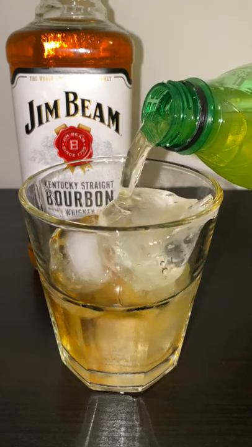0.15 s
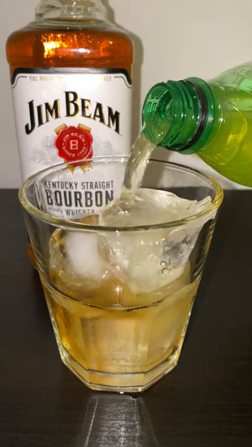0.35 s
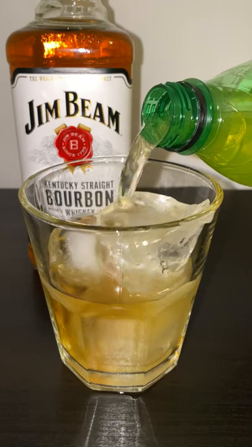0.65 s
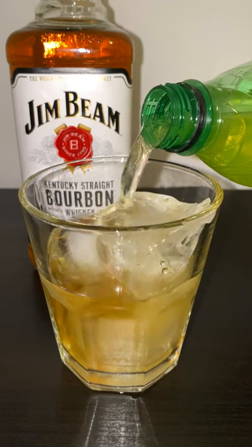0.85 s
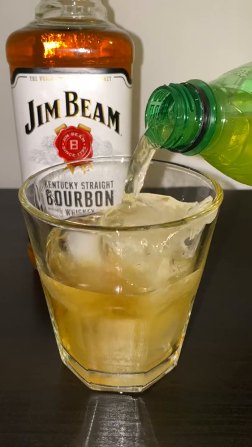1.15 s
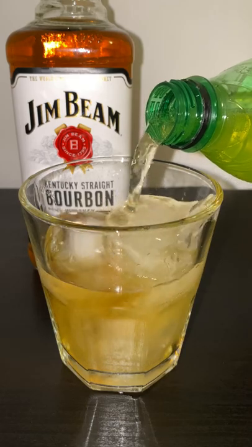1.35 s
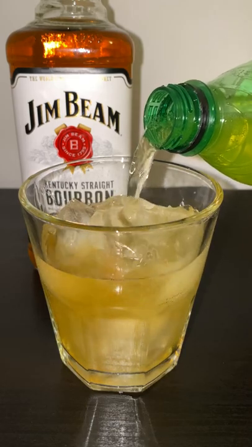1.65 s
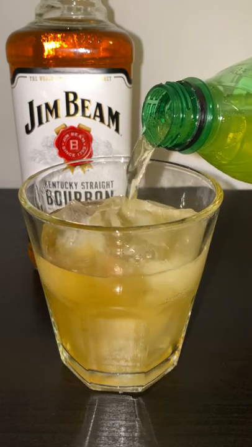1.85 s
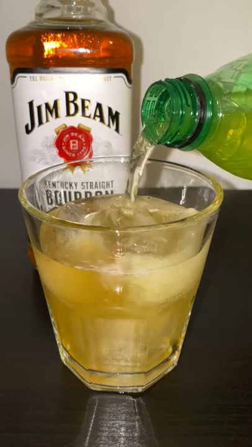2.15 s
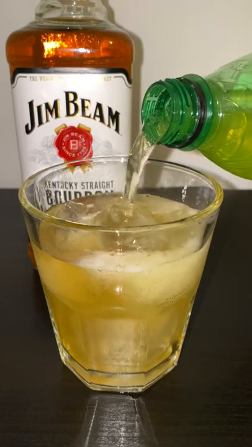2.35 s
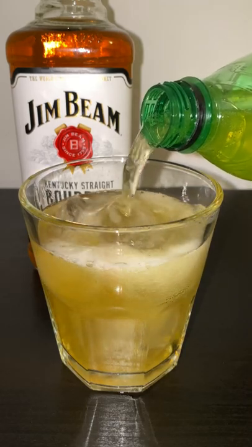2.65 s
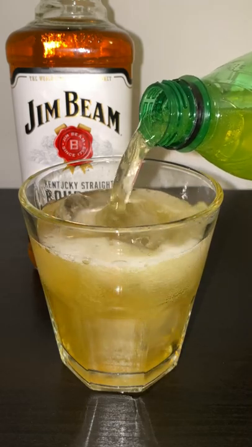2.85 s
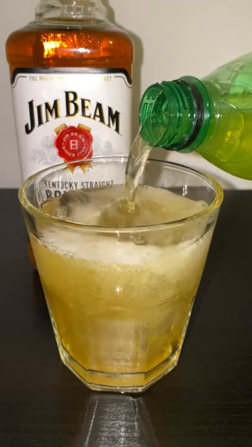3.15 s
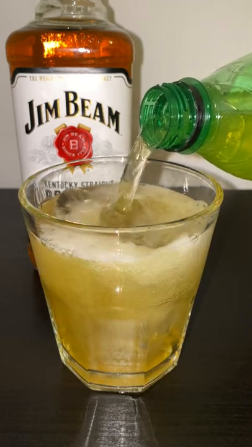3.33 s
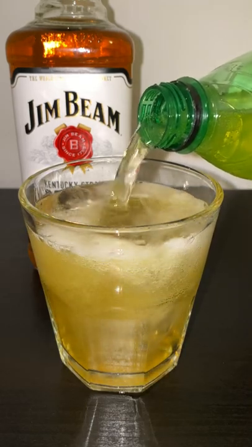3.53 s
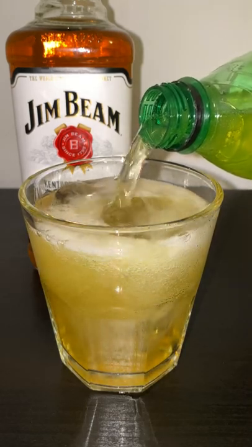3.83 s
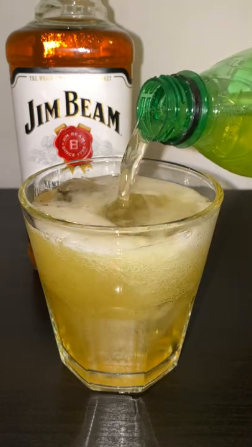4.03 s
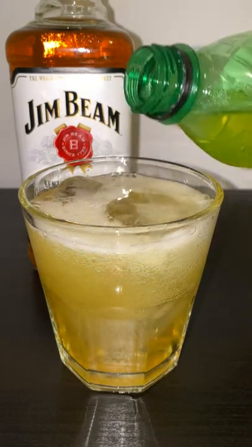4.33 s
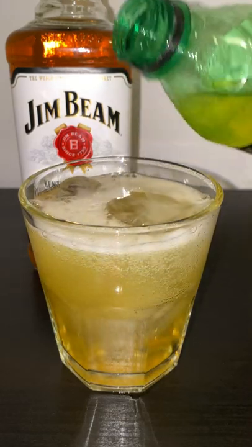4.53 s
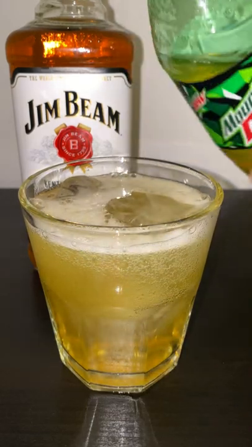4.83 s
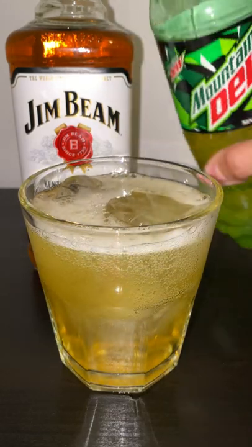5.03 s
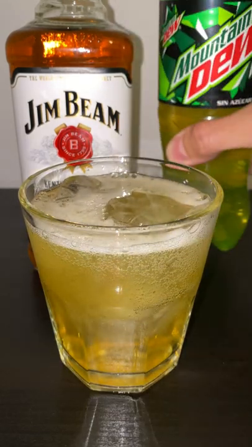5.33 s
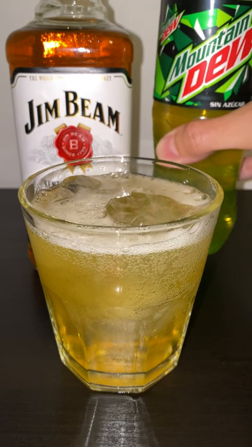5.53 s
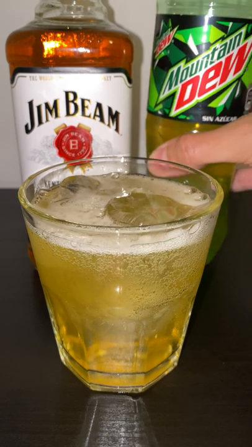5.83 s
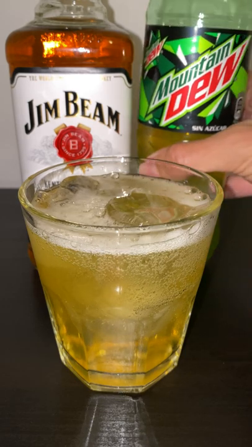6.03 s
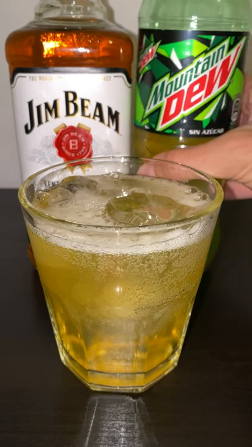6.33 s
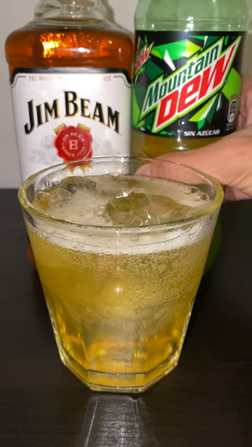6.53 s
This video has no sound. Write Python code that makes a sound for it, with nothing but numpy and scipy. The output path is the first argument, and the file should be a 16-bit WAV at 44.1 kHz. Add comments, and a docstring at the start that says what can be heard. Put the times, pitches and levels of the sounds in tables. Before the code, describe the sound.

Soda trickles from a plastic bottle onto ice in a glass, with small bubbly plinks and sharp ticks of cracking ice. The cubes shift and clatter against the glass, then float and knock softly as a fine fizz builds. The bottle gives a small pop as the pour ends and is set down on a table with a few dull thumps. Heard close up in a small room with a faint low rumble.

```python
"""Over the low rumble of a small room, soda pours from a plastic bottle onto ice in a glass tumbler.
Trapped bubbles plink; the ice cracks as it warms, then shifts and tumbles against the glass.
The cubes float and nudge the wall; from 2 s a head of foam builds, fizzing as its bubbles burst.
At 4.35 s the pour ends and the bottle, tipped back, pops as its wall springs out.
At 6 s it is set down on the table with a few dull thumps and short slides."""
import sys
import numpy as np
from scipy import signal
from scipy.fft import rfft, irfft, next_fast_len
from scipy.io import wavfile
from scipy.ndimage import uniform_filter1d

SR = 44100
rng = np.random.default_rng(int(sys.argv[2]) if len(sys.argv) > 2 else 0)


def generate_wav(signal):
    """Clip the signal to [-1, 1] and save it as 16-bit WAV at the path in sys.argv[1]."""
    frames = np.transpose(np.atleast_2d(signal))
    scaled = np.clip(frames, -1, 1) * 32767
    pcm = np.round(scaled).astype(np.int16)
    wavfile.write(sys.argv[1], SR, pcm)


N = 294588
TIME_S = np.arange(N) / SR
POUR_END_S, CHURN_HZ = 4.35, 879.5

# Table levels are relative; each source adds its own gain.
# room noise spectrum: f/Hz, level/dB
RUMBLE_SPECTRUM = [(18, -46), (30, -27.5), (45, 0), (55, -14), (72, 3.5), (100, -10), (170, -12),
                   (230, -18), (350, -30), (530, -28), (640, -30.5), (740, -50.5), (1400, -47),
                   (12000, -65.5)]
# largest bubbles trapped by the stream: t/s, level/dB, f/Hz
PLINKS = [(0.178, -62.5, 6660), (0.218, -53, 3060), (0.236, -54, 5470), (0.479, -51.5, 6600),
          (0.654, -41.5, 2020), (0.698, -60, 3130), (0.821, -52, 3800), (0.85, -54, 3800),
          (0.966, -59.5, 4760), (1.04, -55.5, 2610), (1.1, -48, 1663), (1.113, -65, 6230),
          (1.252, -49, 2720), (1.297, -63.5, 6500), (1.338, -49.5, 2770), (3.279, -54.5, 3650),
          (3.348, -56, 2980), (3.543, -55.5, 3020)]
# stream splashing off bare ice: t/s, level/dB, bubble f/Hz
SPLASHES = [(.2, -80, 4520), (0.578, -62.5, 3940), (.68, -67, 3070), (.84, -65.5, 3800), (0.949, -73, 4830),
            (1.04, -80, 3520), (1.119, -81, 5830), (1.328, -76, 2770)]
# trickle between cubes, fading once they are covered: start/s, ramp end/s, fade/s, level/dB, fall/(dB/s)
TRICKLE_ENVELOPE = (0.2, 2.7, 1.23, -72.5, 51)
# head of foam: start/s, full/s, collapse/s, level/dB, fall/(dB/s)
FINE_HEAD = (2, 4, 5, -67.5, 6)
COARSE_HEAD = (2.5, 3.5, 5, -76.5, 6.5)
# spectra of bursting foam: f/Hz, level/dB
FINE_SPECTRUM = [(1500, -38), (2450, -4), (2750, -14), (3050, -3), (3400, -4), (3750, -0.5), (4150, -4.5),
                 (4550, -3), (5300, -2), (6900, -2.5), (7900, -7.5), (8500, -13.5), (10500, -31.5),
                 (12000, -71)]
COARSE_SPECTRUM = [(600, -25), (900, -1.5), (1300, -17), (1600, 1), (2100, 6), (2450, 7), (3000, 14.5),
                   (4000, -113.5)]
# air resonances above the foam: f/Hz, width/Hz, level/dB
HEADSPACE = [(2520, 120, -5.5), (3020, 200, -5), (3690, 240, -4.5), (4475, 200, -1.5)]
# ice cracking: t/s, level/dB
CRACKS = [(0.1313, -62.5), (0.2054, -66), (0.2376, -57), (0.2996, -52), (0.3319, -52), (0.356, -52.5),
          (0.478, -52), (0.7463, -60), (0.8497, -64), (0.898, -56.5), (0.967, -61), (1.279, -58),
          (1.3384, -62)]
# ice striking the glass: t/s, clack/dB, weight/dB, wall ring/dB
KNOCKS = [(0.493, -41.5, -34.5, -52), (0.5095, -42, -33.5, -48), (0.5349, -42.5, -40, -69),
          (0.5773, -35.5, -50, -48), (0.596, -38, -46.5, -43.5), (0.6064, -50, -49.5, -46.5),
          (0.6199, -39.5, -41, -48), (0.6835, -42.5, -45.5, -73), (0.93, -45, -39.5, -62),
          (0.9461, -49.5, -35.5, -52), (0.9524, -39.5, -48, -46), (1.2057, -51, -53.5, -52.5),
          (1.2129, -43.5, -41.5, -50.5), (1.3631, -34.5, -34.5, -66.5), (1.3834, -42, -61, -73),
          (1.406, -35, -34, -53.5), (1.4213, -31, -35.5, -50), (1.4396, -33.5, -36.5, -77),
          (1.4733, -32.5, -37, -66.5), (1.4858, -24, -37.5, -40.5), (1.517, -25.5, -35, -56),
          (1.5663, -34.5, -39.5, -50.5), (1.591, -26, -43, -55.5)]
# floating cubes touching the glass: t/s, level/dB
NUDGES = [(1.294, -53), (1.724, -59), (1.808, -57.5), (1.82, -62), (2.011, -62.5), (2.119, -63),
          (2.693, -47), (2.871, -59.5), (2.896, -58), (2.934, -57), (3.036, -51), (3.179, -55), (3.23, -59),
          (3.366, -61), (3.68, -59), (4.317, -62.5)]
# modes of ice, glass and table: f/Hz, level/dB, t60/s
CRACK_MODES = [(2330, -3, .005), (4100, -11, .004), (5300, -7, 0.0034), (6970, -5, 0.01),
               (8630, -6, 0.0034), (9030, -18, 0.0044)]
CUBE_MODES = [(1010, 4.5, 0.011), (1254, -3.5, 0.072), (1540, 6, 0.019), (1840, 18, 0.0052),
              (1880, 3.5, 0.014), (2460, 3.5, 0.011), (2628, 6.5, 0.015), (3440, 1.5, 0.006)]
GLASS_WALL_MODES = [(4237, -2.5, 0.06), (4480, -6.5, 0.038), (5700, -7, 0.0082), (7100, -3, 0.028),
                    (7230, 2, 0.023), (8800, -16, 0.0033), (10700, -25.5, 0.015)]
GLASS_BODY_MODES = [(459, -5, .07), (516, 1, 0.15), (600, -1, 0.096), (678, -5, 0.17), (822, -1.5, 0.08),
                    (911, 3.5, 0.051), (968, -1, 0.12)]
GLASS_BASE_MODES = [(212.6, 3, 0.13), (243, -6, 0.16), (317.4, 0.5, 0.11), (334.6, -4.5, 0.12)]
TABLE_MODES = [(88.9, 1.5, .17), (114, -4, .1), (148, -4, 0.083)]
SUNK_CUBE_MODES = [(503.5, 3, 0.069), (616, 3, 0.022), (679, 1, 0.024), (840, -6, 0.035),
                   (920, -10.5, 0.12), (1205, -13.5, 0.04), (1655, -14, 0.033), (2070, -11, .014)]
# bottle wall springing back: t/s, level/dB
POPS = [(4.347, -44)]
# bottle feet landing: t/s, tap/dB, body/dB
LANDINGS = [(6.015, -90, -46), (6.072, -47.5, -30.5), (6.086, -67, -33.5), (6.398, -51, -39.5),
            (6.408, -87, -39)]
# modes of the bottle: f/Hz, level/dB, t60/s
BOTTLE_WALL_MODES = [(387, -2.5, 0.16), (707, 0, 0.052), (752, 0, 0.052), (1480, -10, 0.095),
                     (1560, -12, 0.029), (2590, -5, 0.051)]
BOTTLE_FOOT_MODES = [(930, -15, 0.045), (1240, -0.5, 0.024), (1510, -2.5, 0.054), (1930, -12.5, 0.028),
                     (2780, -4, 0.0099)]
BOTTLE_BODY_MODES = [(150.4, 4, 0.27), (201, 0.5, .12), (268, -7.5, 0.12), (329.5, 3, .1),
                     (427, -1.5, 0.22), (540, -8.5, 0.13), (667, -15.5, 0.066), (833, -23.5, 0.14)]
# table top swinging under the bottle: t/s, level/dB, f/Hz, length/s
THUMPS = [(6.012, -27, 91.1, 0.063), (6.066, -23, 79.3, 0.099), (6.168, -44, 86.9, 0.14),
          (6.337, -40, 90.2, 0.11), (6.398, -26, 94, 0.061)]
# bottle base rubbing the table: t/s, length/s, level/dB
SLIDES = [(5.996, .14, -57.5), (6.32, 0.14, -61.5), (6.498, 0.12, -65.5)]
# rubbing spectrum: f/Hz, level/dB
RUB_SPECTRUM = [(100, 7), (200, 2), (450, 11), (650, 1), (800, -16.5), (1050, -20), (1270, -5),
                (1400, -16.5), (1530, -19.5), (1900, -16), (4000, -51)]
# room decay: f/Hz, t60/s
ROOM_T60 = [(80, 0.46), (300, 0.62), (900, 0.11), (2000, 0.15), (4500, 0.25), (8000, 0.23), (12000, 0.21)]
# part of the side that follows the mid: f/Hz, share (0-1), phase lead/rad
SIDE_COHERENCE = [(60, .1, -1.6), (250, 0.1, -3), (500, 1, -1.2), (950, .6, -2), (1510, .5, 1.4),
                  (2000, .5, 1.5), (2500, 0.2, 3.), (3050, .6, 5), (3900, 0.9, 4), (4400, 0.3, 5),
                  (4970, 1, 4.5), (5900, .2, 1.5), (6890, .82, 1.74), (8200, .8, 1.4), (9500, .55, 1.5)]
# side gain: f/Hz, level/dB
SIDE_GAIN = [(60, -39), (100, -7.5), (180, -11), (310, -5.5), (540, 2.5), (940, 5.5), (1700, 1),
             (2900, 2.5), (4900, 4), (5900, -8), (7200, -4.5), (8500, 0.5), (10000, 6.5)]


def amp(db):
    return 10 ** (np.asarray(db) / 20)


def unit_rms(x):
    """Scale to rms 1 in the mid (row 0)."""
    return x / np.sqrt(np.mean(x[0] ** 2) + 1e-20)


def log_interp(points, hz):
    """Table lookup on a log-frequency axis."""
    table_hz, value = np.transpose(points)
    return np.interp(np.log(hz + 1), np.log(table_hz + 1), value)


def coloured(x, spectrum):
    """Filter by a spectrum in dB."""
    size = next_fast_len(N + 4096)
    gain = amp(log_interp(spectrum, np.fft.rfftfreq(size, 1 / SR)))
    return irfft(rfft(x, size) * gain, size)[..., :N]


def add(mix, at_s, sound):
    part = mix[:, max(round(at_s * SR), 0):][:, :sound.shape[1]]
    part += sound[:, :part.shape[1]]


def swells(events, rise_s, fall_s):
    """Envelope: 60 dB rise to and fall from each event (t/s, level/dB), summed in power."""
    at_s, db = np.transpose(events)[:, :, None]
    t = TIME_S[::64]
    each = amp(db - 60 * np.maximum((at_s - t) / rise_s, (t - at_s) / fall_s))
    return np.interp(TIME_S, t, np.linalg.norm(each, axis=0))


def plateau(start_s, full_s, fade_s, db, fall_db_per_s):
    """Envelope: linear ramp to a hold, decaying from fade_s."""
    ramp = np.clip((TIME_S - start_s) / (full_s - start_s), 0, 1)
    return ramp * amp(db - fall_db_per_s * np.maximum(TIME_S - fade_s, 0))


def impulses(per_s, spread_db):
    """Clicks at random times, uneven in size."""
    hit = rng.random(N) < per_s / SR
    sign = rng.choice([-1., 1.], (2, N))
    return hit * sign * amp(spread_db * np.minimum(rng.exponential(1, N), 4))


def ring(modes, detune=0.):
    """One blow, mid and side: decaying modes, each starting within its first cycle."""
    hz, db, t60_s = np.transpose(modes)[:, :, None]
    t = np.arange(int(min(t60_s.max(), .5) * SR)) / SR
    hz = hz * (1 + detune * rng.standard_normal(hz.shape))
    phase = rng.random((2, len(hz), 1))
    envelope = amp(db - 60 * t / t60_s) * (1 - np.exp(-(2 * hz * t) ** 2))
    return (envelope * np.sin(2 * np.pi * (hz * t + phase))).sum(1) / np.linalg.norm(amp(db))


def scuffed(sound, contact_s, count=5):
    """Uneven contact: the sound is set off several times within contact_s."""
    at, strength = rng.uniform(0.089, 1, size=count), rng.standard_normal((2, count))
    touches = np.zeros((2, int(contact_s * SR) + 2))
    touches[:, 0] = 1
    touches[:, (at * contact_s * SR).astype(int)] += strength
    touches /= np.linalg.norm(touches, axis=1, keepdims=True)
    return signal.fftconvolve(sound, touches, axes=1)


def blows(events, modes, gain_db, detune, contact_s):
    """A series of blows on one object."""
    out = np.zeros((2, N))
    for at_s, db in events:
        add(out, at_s, amp(db + gain_db) * scuffed(ring(modes, detune), contact_s))
    return out


def room(x, wet_db, near_db=-4.5, near_s=.012):
    """Direct sound, near reflections off table and wall, and a tail dying band by band."""
    shape = (2, SR // 2)
    taps = rng.choice([-1., 1.], shape) * (rng.random(shape) < .1)
    hz, t, bands = signal.stft(taps, SR, nperseg=256)
    decay = amp(-60 * t / log_interp(ROOM_T60, hz)[:, None])
    tail = signal.istft(bands * decay, SR, nperseg=256)[1]
    tail *= np.minimum(np.arange(tail.shape[1]) / SR / near_s, 1)
    response = amp(wet_db) * tail / np.linalg.norm(tail[0])
    for channel in response:
        delays = (near_s * SR * rng.uniform(.1, 1, size=8)).astype(int)
        channel[delays] += amp(near_db) * rng.choice([-1, 1], size=8) / np.sqrt(8)
    response[:, 0] += 1
    return signal.fftconvolve(x, response, axes=1)[:, :N]


def rumble(noise_db=-57.5, hum_hz=538.5, hum_db=-81.):
    """Steady low room noise, with a faint hum in the mid."""
    noise = unit_rms(coloured(rng.standard_normal((2, N)), RUMBLE_SPECTRUM))
    hum = np.outer([1, 0], np.sin(2 * np.pi * hum_hz * TIME_S))
    return amp(noise_db) * noise + amp(hum_db) * hum


def bubble(hz, decay_cycles, rise_per_cycle=0.001):
    """A trapped bubble swells and rings briefly, its pitch rising as it nears the surface."""
    cycles = hz * np.arange(SR // 30) / SR
    envelope = np.exp(-cycles / decay_cycles) * (1 - np.exp(-(cycles / 2) ** 2))
    phase = cycles * (1 + rise_per_cycle * cycles / 2) + rng.random((2, 1))
    return envelope * np.sin(2 * np.pi * phase)


def swarm(length_s, hz, per_s, spread_oct, spread_db, decay_cycles, count=1000):
    """Bubbles of random size around one pitch, at rms 1."""
    out = np.zeros((2, int(length_s * SR)))
    times_s = (np.arange(count) + rng.random(count)) / per_s
    pitches, strengths = rng.standard_normal((2, count))
    for at_s, pitch, strength in zip(times_s[times_s < length_s], pitches, strengths):
        bubble_hz = hz * 2 ** np.clip(spread_oct * pitch, -1, 1)
        add(out, at_s, amp(spread_db * min(strength, 2)) * bubble(bubble_hz, decay_cycles))
    return unit_rms(out)


def churn(steady_db=-95.5, stir_db=-32):
    """The stream churns the drink; each moving cube stirs up more, in step with its blow."""
    out = np.zeros((2, N))
    add(out, 0, swarm(POUR_END_S, CHURN_HZ, per_s=180, spread_oct=.209, spread_db=10.5, decay_cycles=11))
    stirs = [(at_s, clack_db) for at_s, clack_db, _, _ in KNOCKS] + NUDGES
    return out * (amp(steady_db) + amp(stir_db) * swells(stirs, rise_s=.23, fall_s=.45))


def foam(first_fizz_db=-86, flutter_db=.5):
    """Bursting bubbles merge into fizz, faint at first; coarser ones join as the head builds."""
    fine = room(impulses(per_s=9000, spread_db=2.5), wet_db=-17.5, near_db=-10.5)
    fine = coloured(fine, FINE_SPECTRUM)
    resonance = sum(amp(db) * signal.lfilter(*signal.iirpeak(hz, hz / width_hz, SR), fine)
                    for hz, width_hz, db in HEADSPACE)
    hiss = unit_rms(fine + resonance) * np.hypot(amp(first_fizz_db), plateau(*FINE_HEAD))
    coarse = coloured(impulses(per_s=4000, spread_db=3.5), COARSE_SPECTRUM)
    froth = unit_rms(coarse) * plateau(*COARSE_HEAD)
    # bubbles give way in clusters
    clusters = unit_rms(uniform_filter1d(rng.standard_normal((1, N)), size=SR // 20))
    return amp(flutter_db * clusters) * (hiss + froth)


def ice_cracks():
    """Warming ice splits with short, bright ticks."""
    return room(blows(CRACKS, CRACK_MODES, gain_db=.5, detune=.044, contact_s=.0012), wet_db=-5.5)


def plinks(gain_db=9.5, decay_s=.0014, pinch_s=.004):
    """Large bubbles pinch off and ring, with one decay time for all sizes."""
    out = np.zeros((2, N))
    for at_s, db, hz in PLINKS:
        add(out, at_s, amp(db + gain_db) * scuffed(bubble(hz, hz * decay_s), pinch_s))
    return out


def trickle():
    """The stream bubbles between bare cubes until they are covered."""
    out = np.zeros((2, N))
    add(out, 0, swarm(length_s=2, hz=2950, per_s=450, spread_oct=.46, spread_db=6.5, decay_cycles=6))
    return out * plateau(*TRICKLE_ENVELOPE)


def splashes(rise_s=.012, t60_s=.33):
    """The stream hits bare ice and throws sprays of small bubbles."""
    out = np.zeros((2, N))
    for at_s, db, hz in SPLASHES:
        spray = swarm(t60_s, hz, per_s=980, spread_oct=.3, spread_db=8.5, decay_cycles=8.1)
        t = TIME_S[:spray.shape[1]]
        envelope = np.minimum(t / rise_s, 1) * amp(db - 60 * (t - rise_s) / t60_s)
        add(out, at_s, envelope * spray)
    return out


def ice_grind(gain_db=-34.5):
    """Cubes grind as they slide into and out of each knock."""
    contacts = impulses(per_s=2800, spread_db=2.5)
    grind = unit_rms(signal.fftconvolve(contacts, ring(CUBE_MODES), axes=1)[:, :N])
    clacks = [(at_s, clack_db) for at_s, clack_db, _, _ in KNOCKS]
    return amp(gain_db) * swells(clacks, rise_s=.11, fall_s=.34) * grind


def ice_knocks(wall_gain_db=-1., body_gain_db=-3.5, base_gain_db=.5, table_gain_db=8.5):
    """Each falling cube grinds, clacks, rings the tumbler and shakes the table through its base."""
    clack_share, fill_db_per_s, full_s = .81, 5.5, 1.52  # the body answers more as it fills
    buoyancy_db_per_s = 3  # the rising drink carries the ice: the table shakes less
    cubes, wall, low = np.zeros((3, 2, N))
    for at_s, clack_db, weight_db, wall_db in KNOCKS:
        body_db = clack_share * clack_db + (1 - clack_share) * weight_db
        body_db += fill_db_per_s * (at_s - full_s)
        table_db = weight_db - buoyancy_db_per_s * at_s
        clack = scuffed(ring(CUBE_MODES, detune=.063), contact_s=.002976)
        clink = scuffed(ring(GLASS_WALL_MODES, detune=.013), contact_s=.0067)
        add(cubes, at_s, amp(clack_db) * clack)
        add(wall, at_s, amp(wall_db + wall_gain_db) * clink)
        add(low, at_s, amp(body_db + body_gain_db) * ring(GLASS_BODY_MODES, detune=.023))
        add(low, at_s, amp(weight_db + base_gain_db) * ring(GLASS_BASE_MODES, detune=.021))
        add(low, at_s, amp(table_db + table_gain_db) * ring(TABLE_MODES, detune=.022))
    return (room(cubes + ice_grind(), wet_db=-10.5, near_db=-10)
            + room(wall, wet_db=-11.5, near_db=-20)
            + room(low, wet_db=-8.5, near_db=-13.5))


def floating_ice(gain_db=2.5, tilt_per_oct=.66):
    """Cubes nudge the glass under the liquid; softer nudges are duller."""
    out = np.zeros((2, N))
    hardest_db = max(db for _, db in NUDGES)
    for at_s, db in NUDGES:
        cut_db_per_oct = tilt_per_oct * (hardest_db - db)
        modes = [(hz, mode_db - cut_db_per_oct * max(np.log2(hz / CHURN_HZ), 0), t60_s)
                 for hz, mode_db, t60_s in SUNK_CUBE_MODES]
        add(out, at_s, amp(db + gain_db) * ring(modes, detune=.023))
    return room(out, wet_db=-5, near_db=-.5)


def bottle_pop():
    """The plastic wall springs back and rings."""
    pop = blows(POPS, BOTTLE_WALL_MODES, gain_db=-2.5, detune=0, contact_s=.0002)
    return room(pop, wet_db=-18, near_db=-20)


def bottle_landing(slide_rise_s=.035):
    """The bottle rocks onto its feet: taps, a hollow body, a swinging table top, short slides."""
    taps, swing = np.zeros((2, 2, N))
    for at_s, tap_db, body_db in LANDINGS:
        add(taps, at_s, amp(tap_db) * ring(BOTTLE_FOOT_MODES, detune=.018))
        add(taps, at_s, amp(body_db) * ring(BOTTLE_BODY_MODES, detune=.011))
    for at_s, db, hz, length_s in THUMPS:
        t = np.arange(int(length_s * SR)) / SR
        phase = 2 * np.pi * hz * t
        envelope = amp(db) * np.sin(np.pi * t / length_s)
        add(swing, at_s, envelope * np.array([np.sin(phase), -np.cos(phase)]))
    sliding = sum(plateau(at_s, at_s + slide_rise_s, at_s + length_s, db, fall_db_per_s=210)
                  for at_s, length_s, db in SLIDES)
    rub = sliding * unit_rms(coloured(impulses(per_s=1500, spread_db=-.5), RUB_SPECTRUM))
    return room(taps, wet_db=-24, near_db=-12.5) + room(swing, wet_db=-16, near_db=-44.5) + rub


def left_right(mid, side):
    """The side is part phase-shifted mid, part diffuse; bass nearly mono, midrange wide."""
    size = next_fast_len(N + 4096)
    hz, table = np.fft.rfftfreq(size, 1 / SR), np.array(SIDE_COHERENCE)
    share = np.clip(log_interp(table[:, :2], hz), 0, 1)
    lead_rad = log_interp(table[:, ::2], hz)
    coherent = share * np.exp(1j * lead_rad) * rfft(mid, size)
    diffuse = np.sqrt(1 - share ** 2) * rfft(side, size)
    side = coloured(irfft(coherent + diffuse, size)[:N], SIDE_GAIN)
    return np.array([mid + side, mid - side])


def scene():
    """All sources summed as mid and side, then turned to left and right."""
    stream = room(churn() + plinks() + trickle() + splashes(), wet_db=-6.5, near_db=-10)
    ice = ice_cracks() + ice_knocks() + floating_ice()
    bottle = bottle_pop() + bottle_landing()
    return left_right(*(rumble() + stream + foam() + ice + bottle))


def record(dry):
    """Low-pass at 11.8 kHz."""
    lowpass = signal.firwin(255, 11800, window=("kaiser", 8), fs=SR)
    return signal.oaconvolve(dry, lowpass[None], "same")


dry = scene()
out = record(dry)
generate_wav(out)
```